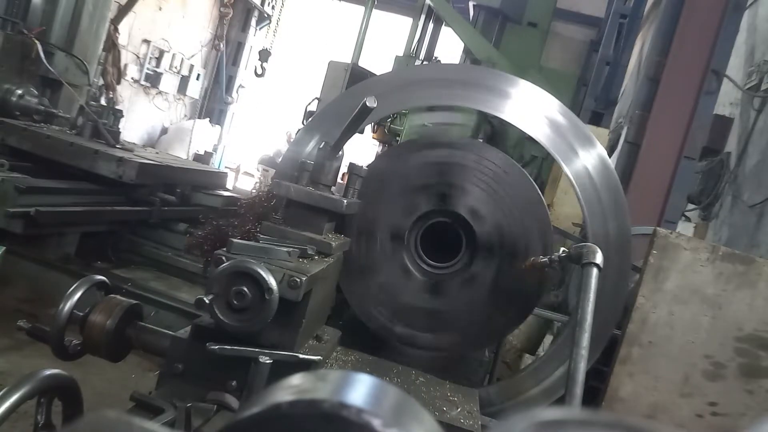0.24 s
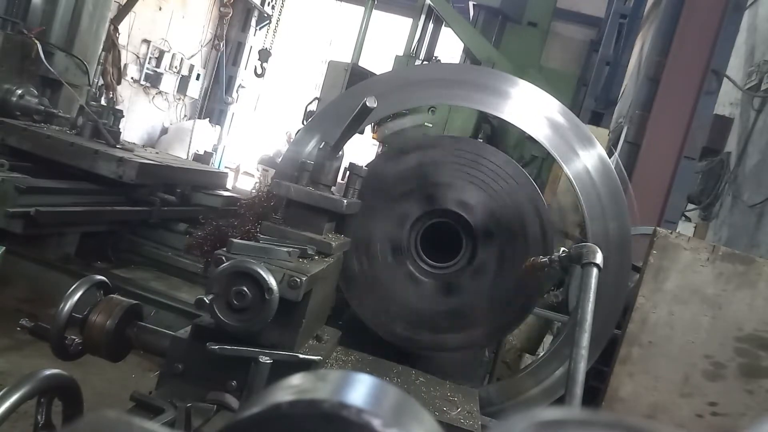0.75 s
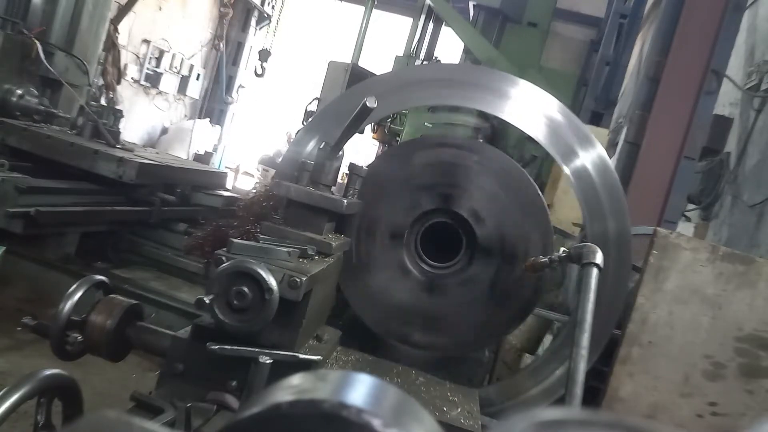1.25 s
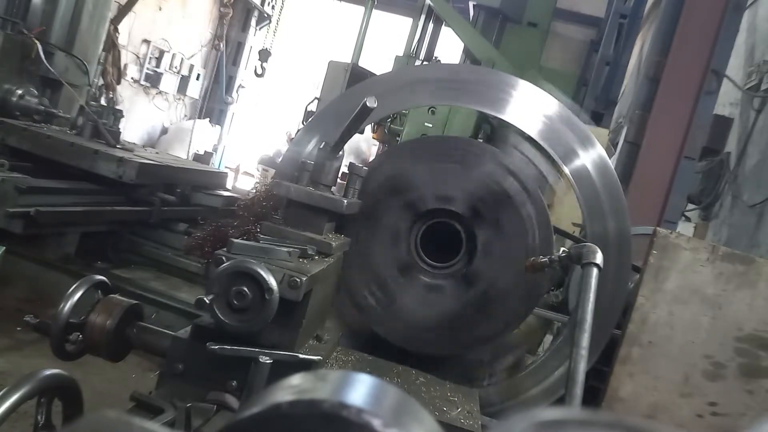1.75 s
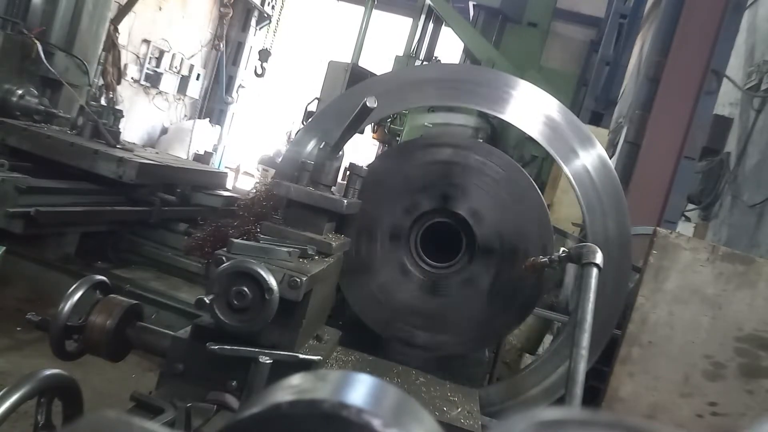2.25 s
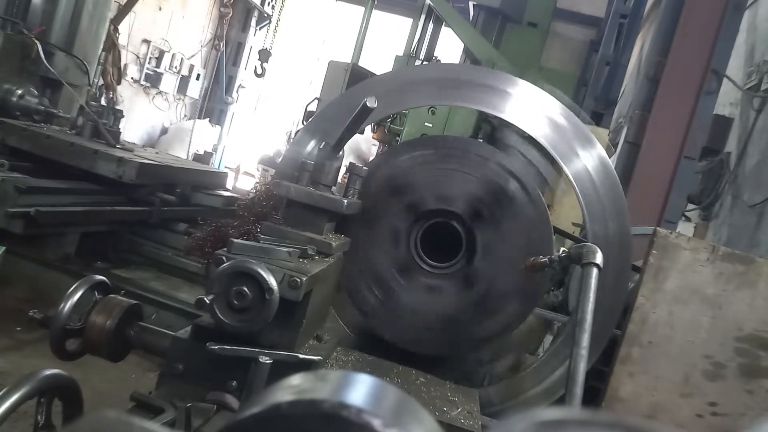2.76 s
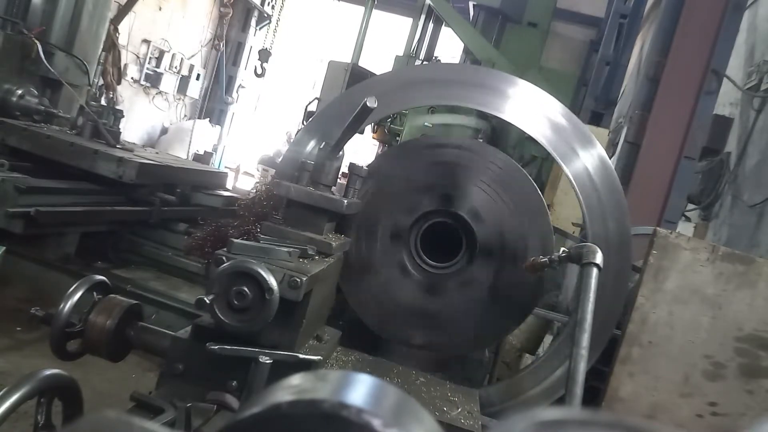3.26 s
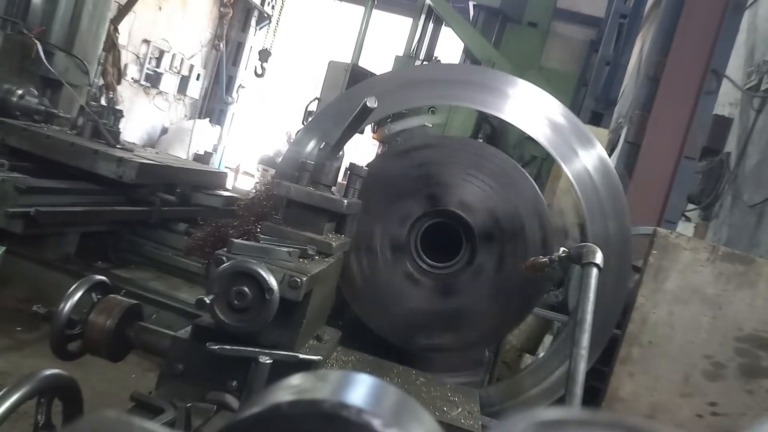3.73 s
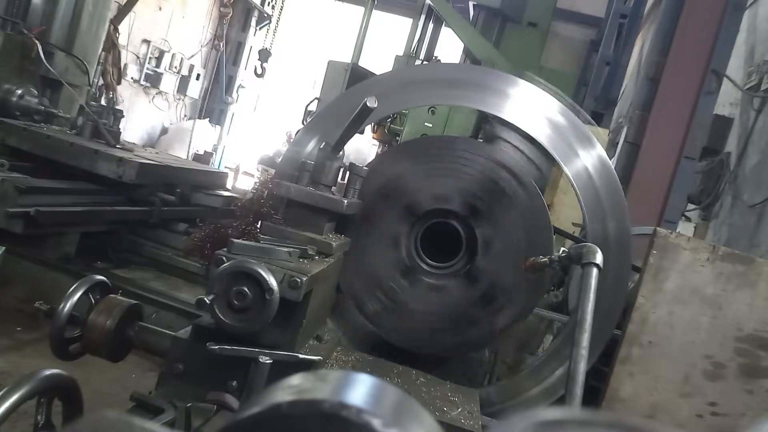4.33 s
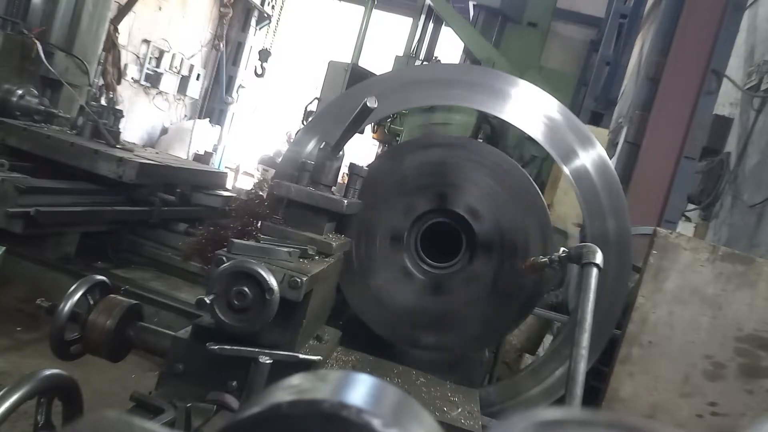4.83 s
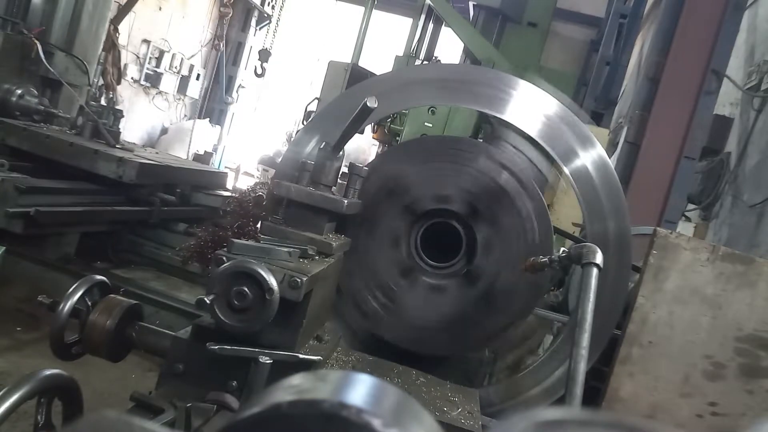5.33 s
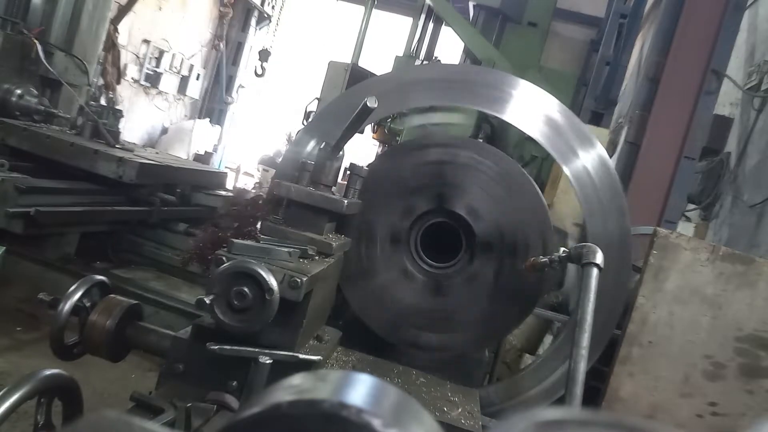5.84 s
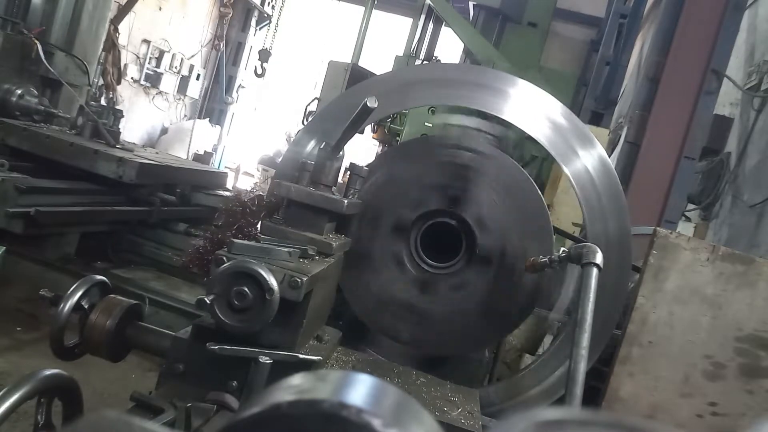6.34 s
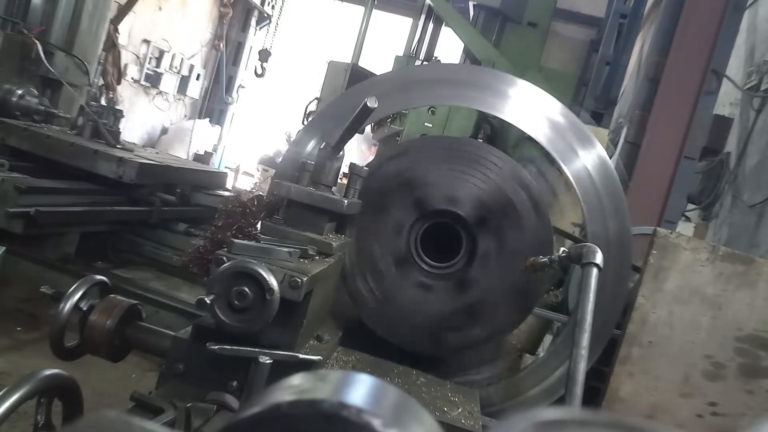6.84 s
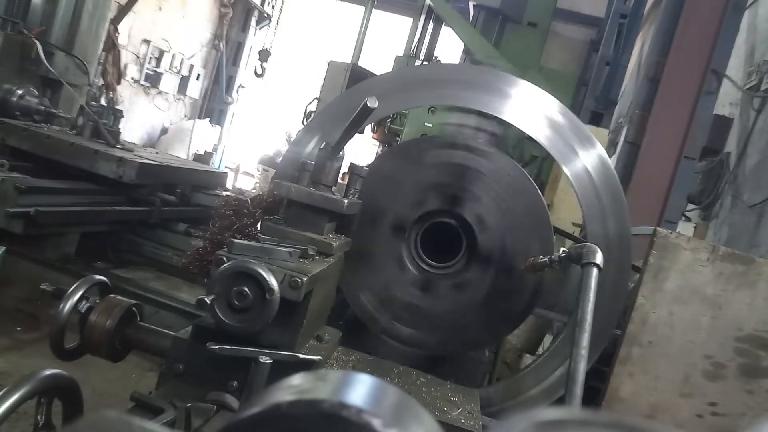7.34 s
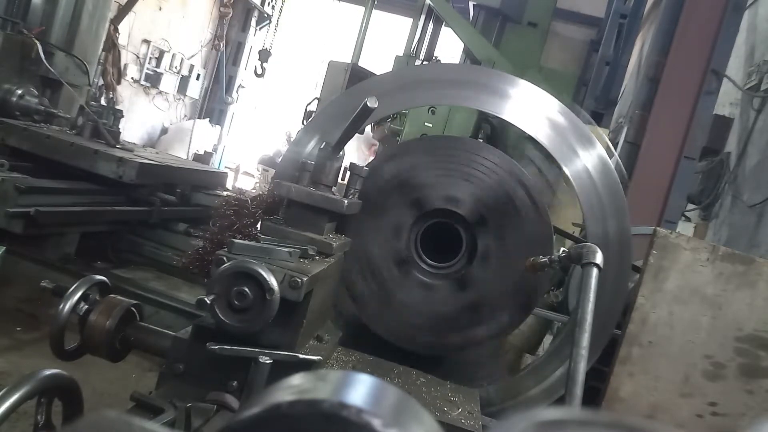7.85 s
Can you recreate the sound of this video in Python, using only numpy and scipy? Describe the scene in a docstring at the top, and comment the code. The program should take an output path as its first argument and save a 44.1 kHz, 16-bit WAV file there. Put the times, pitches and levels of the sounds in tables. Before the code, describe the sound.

Steady lathe rumble and rushing gears fill a reverberant workshop, heard from near the chuck on one microphone. Metal scrapes and hisses as chips shear off. Over this, a loud, fluttering whistle-like squeal snaps on and drops away, repeating regularly through the middle, then becoming sparse. Near the end only thin, faint singing and hiss remain, and the machine noise rises at the very last moment.

```python
"""In a workshop, from in front of the chuck: a large lathe turns a steel ring.
Furthest back, shaped noise and resonances make the drive's rumble, the gears and the ring's faint modes.
Nearer, random slips hiss as the chip; the hiss sinks once a revolution, where the cut runs shallow.
Foremost, the tool chatters: a wandering tone near 5.2 kHz with side modes and overtones
breaks in and dies away, fluttering in the room's echoes."""
import sys
import numpy as np
from scipy import signal
from scipy.fft import rfft, irfft, next_fast_len
from scipy.io import wavfile
from scipy.ndimage import uniform_filter1d, minimum_filter1d

SR = 44100
rng = np.random.default_rng(int(sys.argv[2]) if len(sys.argv) > 2 else 0)


def output_pcm(signal):
    """Save a mono or channel-first signal as 16-bit PCM at the path in sys.argv[1].

    Samples are clipped to [-1, 1] before scaling.
    """
    pcm = np.clip(np.atleast_2d(signal).T, -1, 1) * 32767
    wavfile.write(sys.argv[1], SR, np.round(pcm).astype(np.int16))


N = 356328  # length in samples

# Noise spectra of the drive, the gears, the scraping tool and the chip (shape only):
# pitch_hz [Hz], level_db [dB per Hz, relative]
RUMBLE_SPECTRUM = [(25, -38), (48, -22), (64, -22), (76, -9), (86, -21), (100, -7), (125, -3), (150, -4),
                   (200, -0.5), (320, -1.5), (460, 0), (540, -12.5), (800, -33.5), (1600, -52)]
GEAR_SPECTRUM = [(300, -23), (560, -1.5), (760, 2.5), (1100, -2.5), (1400, -0.5), (1900, -7), (2800, -16.5),
                 (6000, -49.5)]
SCRAPE_SPECTRUM = [(900, -21), (1500, -7), (1950, -3.5), (2400, 3), (2900, -1.5), (3300, 0), (3800, -1.5),
                   (4900, -2), (6200, -8.5), (7800, -14), (9300, -36.5)]
CHIP_SPECTRUM = [(2000, -2.5), (4500, 9.5), (6200, 10), (7200, 5), (8300, 2), (8900, -8.5), (9600, -23),
                 (10500, -7), (11700, -6), (13000, -3), (13750, -6), (14700, -3), (15250, -9), (16000, -6)]
# Hum of the drive: pitch_hz [Hz], width_hz [Hz], level_db [dB]
HUM_MODES = [(75.4, 4, -59), (122, 6, -50), (172, 6, -48), (200, 9, -43), (366, 8, -49)]
# Modes of the steel ring: pitch_hz [Hz], width_hz [Hz], level_db [dB, before load and trim]
RING_MODES = [(732, 12, -53), (975, 6, -53), (1243, 5, -49), (1627, 7, -47), (1724, 5, -48), (2204, 9, -52),
              (2502, 5, -42.5), (2587, 7, -51), (3123, 4, -52), (3468, 9, -54), (3548, 5, -50),
              (3645, 9, -54), (3903, 5, -53), (4165, 5, -47.5), (4510, 20, -51), (4701, 7, -50),
              (4958, 8, -51)]
# Modes of the tool and its holder, shaken by the chip:
# pitch_hz [Hz], width_hz [Hz], level_db [dB, relative]
HOLDER_MODES = [(3262, 24, 6), (5270, 70, -1), (5530, 110, 1), (5780, 110, 1), (6245, 6, -7), (6515, 14, 1),
                (6788, 26, -4), (7025, 20, -4), (7172, 30, 0), (7288, 7, -3), (7547, 10, -4),
                (7660, 26, -7), (7810, 12, -4), (8075, 16, -14), (8328, 7, -11), (11220, 130, -18),
                (12100, 130, -14), (12570, 160, -13), (13100, 100, -11), (13750, 330, -6),
                (14210, 110, -13), (15240, 150, -7)]
# Modes of the thin, higher whistle of a smooth cut: pitch_hz [Hz], width_hz [Hz], level_db [dB, relative]
HIGH_WHISTLE_MODES = [(5765, 40, -2), (5830, 35, -7)]
# Modes that beat against the squeal: pitch_hz [Hz], width_hz [Hz], level_db [dB, relative]
BEATING_MODES = [(4701, 14, -18), (4958, 16, -12.5), (4990, 200, -8), (5418, 40, -1), (5470, 45, 0),
                 (5535, 35, -5), (5590, 70, -16)]
# Load on the machine, heard as the level of its noise: time_s [s], level_db [dB, only its swing counts]
LOAD_CURVE = [(0.0, -30), (0.02, -28), (0.81, -31), (2.43, -29), (5.54, -28), (5.83, -25.5), (7.83, -27.5),
              (8.03, -21.5), (8.08, -21.5)]
# Turns on which the tool chatters; the growth comes before start_s:
# start_s [s, full level reached], hold_s [s], level_db [dB, main tone before flutter],
# growth_db_per_s [dB/s], pitch_hz [Hz, before onset and wander], side_db [dB, before onset and trim]
CHATTER_TURNS = [(0.01, 0.11, -8, 370, 5193, -15), (0.249, 0.31, -8.5, 600, 5191, -15),
                 (0.692, 0.32, -11.0, 722, 5199, -16.0), (1.729, 0.19, -12.0, 260, 5190, -12.5),
                 (2.018, 0.33, -10.0, 800, 5203, -13), (2.477, 0.32, -10, 360, 5193, -13),
                 (2.903, 0.34, -11.0, 630, 5191, -14), (3.374, 0.31, -9.5, 468, 5193, -12.5),
                 (3.814, 0.32, -10.5, 500, 5182, -13.5), (4.253, 0.32, -11.0, 590, 5180, -12.5),
                 (5.275, 0.21, -11.5, 510, 5175, -10.5), (6.171, 0.2, -11.5, 420, 5185, -10),
                 (6.471, 0.33, -9.5, 520, 5182, -10.5)]
# Turns on which the tool cuts smoothly and barely sings:
# start_s [s, full level reached], hold_s [s], level_db [dB, main tone before flutter and dip],
# pitch_hz [Hz, before wander], whistle_db [dB, before mode levels and flutter]
SMOOTH_TURNS = [(1.17, 0.27, -37, 5187, -43), (4.736, 0.29, -36.5, 5200, -40),
                (5.631, 0.275, -36.5, 5230, -42), (6.04, 0.081, -47, 5230, -42),
                (6.934, 0.27, -33, 5210, -35.5), (7.385, 0.296, -38.5, 5290, -39.5),
                (7.855, 0.28, -30.5, 5300, -30)]

# the ring is out of round: once a turn the cut runs shallow
TURN_S, FIRST_SHALLOW_S, SHALLOW_HALF_S = 0.4444, 0.188, 0.072
HISS_DIP_DB, SINGING_DIP_DB = 6, 2  # dips of the chip and the faint singing there

# each layer before its trims at mean load, and the share of the load's swing that it follows
RUMBLE_DB, RUMBLE_FOLLOWS = -32, 0.9
GEARS_DB, GEARS_FOLLOWS = -34.5, 1.07
SCRAPE_DB, SCRAPE_FOLLOWS = -30, 0.87
CHIP_DB, CHIP_FOLLOWS = -51.5, 0.51

SMOOTH_EDGE_DB_PER_S, SMOOTH_HISS_DB = 222, 3.5  # rise and fall of smooth cuts; extra chip level in them
# chatter collapses quickly when the cut eases, then the steel rings on
COLLAPSE_DB_PER_S, RING_ON_BELOW_DB, RING_ON_DB_PER_S = 201, 10, 52
# after a turn without chatter the squeal turns sharp and harsh just ahead of full level, then settles
ONSET_SHARP_HZ, ONSET_HARSH_DB, ONSET_LEAD_S, SETTLE_S = 29.74, 10.5, 0.043, 0.055
FLUTTER_DB, FAINT_FLUTTER_DB, FLUTTER_PER_S = 1.76, 2.6, 9.8
SLOW_WANDER_HZ, FAST_WANDER_HZ, RIPPLE_HZ = 10.96, 15.9, 15  # pitch swings before harshness scales them
CUTOFF_HZ = 15800


def from_db(db):
    """Decibels to gain."""
    return 10 ** (np.asarray(db) / 20)


def rms_one(x):
    """Scale to unit power."""
    return x / np.sqrt(np.mean(np.abs(x) ** 2) + 1e-20)


def in_time(rows):
    """One interpolated curve per column after the time, a value for each sample."""
    time_s, *columns = np.transpose(rows)
    return [np.interp(np.arange(N) / SR, time_s, column) for column in columns]


def drift(rate):
    """Smooth chance with unit spread; it wanders faster at a higher rate in Hz."""
    r = np.exp(-20 * np.pi * rate / SR)
    # made at a tenth of the sample rate, past the filter's run-in
    noise = rng.standard_normal(N // 10 + 8002)
    slow = signal.lfilter([1], [1, -2 * r, r * r], noise)[8000:]
    return np.interp(np.arange(N) / 10, np.arange(len(slow)), rms_one(slow))


def coloured(x, spectrum):
    """Give x a smooth spectrum that falls off beyond the table's ends; unit power."""
    size = next_fast_len(N)
    hz, level_db = np.transpose(spectrum)
    bins = np.maximum(np.fft.rfftfreq(size, 1 / SR), 1)
    low_edge = 1 + (hz[0] / 2 / bins) ** 4
    high_edge = 1 + (bins / hz[-1] / 2) ** 10
    edge = 1 / np.sqrt(low_edge * high_edge)
    shape = from_db(np.interp(np.log(bins), np.log(hz), level_db))
    return rms_one(irfft(rfft(x, size) * edge * shape, size)[:N])


def resonate(x, hz, width):
    """One resonance of the given width in Hz, with gain 1 on its top."""
    r = np.exp(-np.pi * width / SR)
    feedback = [1, -2 * r * np.cos(2 * np.pi * hz / SR), r * r]
    return signal.lfilter(np.array([1, 0, -1]) * (1 - r * r) / 2, feedback, x)


def shaken(modes, skirt=6):
    """Modes kept ringing by a random force; a second, wider resonance steepens their skirts."""
    force = rng.standard_normal(N + SR // 2)  # half a second of run-in
    out = np.zeros(N)
    for hz, width, db in modes:
        mode = resonate(resonate(force, hz, width), hz, width * skirt)
        out += from_db(db) * rms_one(mode[-N:])
    return out


def evened(x, seconds):
    """Hold the slow level near 1 and keep the fast flutter."""
    size = max(int(seconds * SR), 2)
    power = uniform_filter1d(uniform_filter1d(x * x, size), size)
    return x / np.sqrt(power + 1e-9)


def ringing(x, t60, wet_db):
    """Direct sound plus a dense dying tail: a room's echoes, or the countless modes of a steel body."""
    t = np.arange(SR // 2) / SR
    tail = rng.standard_normal(len(t)) * from_db(-60 * t / t60) * (t > 0.003)
    run_in = np.pad(x, (len(t), 0), mode="reflect")
    wet = signal.fftconvolve(run_in, tail / np.linalg.norm(tail))[len(t):len(t) + N]
    return x + from_db(wet_db) * wet


def swell(start, hold, growth, decay):
    """Growth up to start, hold, then decay, in dB below the top; slopes in dB per second."""
    t = np.arange(N) / SR - start
    return np.minimum(np.minimum(growth * t, decay * (hold - t)), 0)


def load():
    """The load in dB about its mean."""
    level_db, = in_time(LOAD_CURVE)
    return level_db - level_db.mean()


def shallow():
    """0 to 1: a smooth bump each time the shallow side of the ring passes the tool."""
    since_first = np.arange(N) / SR - FIRST_SHALLOW_S
    away_s = np.abs((since_first + TURN_S / 2) % TURN_S - TURN_S / 2)
    return np.cos(np.pi / 2 * np.minimum(away_s / SHALLOW_HALF_S, 1)) ** 2


def machine():
    """Behind the cut: the drive rumbles and hums, gears rush, the tool scrapes and the ring sings along.

    All but the hum grow louder under load."""
    load_db = load()
    rumble_db = RUMBLE_DB + RUMBLE_FOLLOWS * load_db + 0.54 * drift(8.8)
    rumble = from_db(rumble_db) * coloured(rng.standard_normal(N), RUMBLE_SPECTRUM)
    gears_db = GEARS_DB + GEARS_FOLLOWS * load_db + 0.5 * drift(30)
    gears = from_db(gears_db) * coloured(rng.standard_normal(N), GEAR_SPECTRUM)
    scrape_db = SCRAPE_DB + SCRAPE_FOLLOWS * load_db + 0.58 * drift(30)
    scrape = from_db(scrape_db) * coloured(rng.standard_normal(N), SCRAPE_SPECTRUM)
    ring = from_db(1.1 * load_db + 1.5) * shaken(RING_MODES)
    return rumble + shaken(HUM_MODES) + gears + scrape + ring


def chip():
    """The chip shears off in tiny uneven slips that hiss through the steel and shake the tool holder.

    Smooth cuts add a high whistle."""
    smooth = [from_db(swell(start, hold, SMOOTH_EDGE_DB_PER_S, SMOOTH_EDGE_DB_PER_S))
              for start, hold, *_ in SMOOTH_TURNS]
    cut_db = CHIP_DB + CHIP_FOLLOWS * load() - HISS_DIP_DB * shallow() + SMOOTH_HISS_DB * sum(smooth)
    slips = rng.standard_normal(N) * from_db(3.2 * drift(200))
    hiss = from_db(10) * coloured(ringing(slips, t60=0.055, wet_db=-4), CHIP_SPECTRUM)
    holder = from_db(2) * shaken(HOLDER_MODES)
    cutting = from_db(cut_db + 1.2 * drift(25)) * (hiss + holder)
    whistle_gain = sum(gate * from_db(db) for gate, (*_, db) in zip(smooth, SMOOTH_TURNS))
    whistle_flutter = from_db(FAINT_FLUTTER_DB * drift(FLUTTER_PER_S))
    return cutting + whistle_gain * whistle_flutter * shaken(HIGH_WHISTLE_MODES)


def vibration():
    """Level of the tool's main tone in dB: chatter, its ringing on, and the faint singing of smooth cuts."""
    loud, faint = [], []
    for start, hold, db, growth, _, _ in CHATTER_TURNS:
        loud.append(db + swell(start, hold, growth, COLLAPSE_DB_PER_S))
        faint.append(db - RING_ON_BELOW_DB + swell(start, hold, growth, RING_ON_DB_PER_S))
    for start, hold, db, _, _ in SMOOTH_TURNS:
        faint.append(db + swell(start, hold, SMOOTH_EDGE_DB_PER_S, SMOOTH_EDGE_DB_PER_S))
    faint_db = np.max(faint, axis=0) - SINGING_DIP_DB * shallow()
    return np.maximum(np.max(loud, axis=0), faint_db)


def tuning():
    """Pitch in Hz and harshness in dB: each turn holds its own, both raised as chatter breaks in from rest."""
    t = np.arange(N) / SR
    turns = [(start, hold, hz) for start, hold, _, _, hz, _ in CHATTER_TURNS]
    turns += [(start, hold, hz) for start, hold, _, hz, _ in SMOOTH_TURNS]
    pitch, = in_time(sorted((edge, hz) for start, hold, hz in turns for edge in (start, start + hold)))
    harsh_db, = in_time([(edge, db) for start, hold, _, _, _, db in CHATTER_TURNS
                         for edge in (start, start + hold)])
    # from rest: more than one turn of quiet since the last chatter
    from_rest = [start for (last, hold, *_), (start, *_) in zip(CHATTER_TURNS, CHATTER_TURNS[1:])
                 if start - last - hold > TURN_S]
    fresh = sum(np.exp(-np.abs(t - start + ONSET_LEAD_S) / SETTLE_S) for start in from_rest)
    return pitch + ONSET_SHARP_HZ * fresh, harsh_db + ONSET_HARSH_DB * fresh


def squeal():
    """The tool tip vibrates by itself in its first mode; side modes beat against it, the room makes it flutter."""
    level_db = vibration()
    pitch, harsh_db = tuning()
    extra_harsh_db = harsh_db - harsh_db.mean()
    # the uneven chip pulls the pitch about, more so in harsh chatter; a ripple in the drive rocks it
    ripple = np.sin(2 * np.pi * 49.7 * np.arange(N) / SR)
    wander = SLOW_WANDER_HZ * drift(24.6) + FAST_WANDER_HZ * drift(100) + RIPPLE_HZ * ripple
    wander = wander * from_db(0.28 * extra_harsh_db)
    first = np.exp(2j * np.pi * np.cumsum(pitch + wander) / SR)

    # faint tones flutter more deeply than loud ones
    flutter_depth_db = np.interp(level_db, [-30, -15], [FAINT_FLUTTER_DB, FLUTTER_DB])
    flutter_db = flutter_depth_db * np.minimum(drift(FLUTTER_PER_S), 1)
    main_tone = evened(ringing(first.real, t60=0.39, wet_db=9), seconds=0.05)
    out = from_db(level_db + flutter_db) * main_tone

    # the tip's swing has a ceiling; side modes and overtones follow it without the level flutter
    swing_db = np.minimum(level_db, -10.5)
    beating = signal.hilbert(shaken(BEATING_MODES, skirt=3.4), next_fast_len(N))[:N]
    side = from_db(harsh_db) * rms_one(beating)
    out += from_db(swing_db + 3) * side.real

    # the tip leaves the cut at each swing, which adds overtones: strongest in harsh chatter
    tip = first + from_db(1.5) * side
    tip = tip / (np.abs(tip) + 0.01) ** 0.26  # compress the beats
    overtone_db = 1.43 * swing_db + extra_harsh_db - 24
    for order in (2, 3):
        overtone = ringing((tip ** order).real, t60=0.4, wet_db=11)
        out += from_db(overtone_db) * evened(overtone, seconds=0.049)
    return out


def scene():
    """Everything as heard in front of the chuck, on one microphone channel."""
    return (machine() + chip() + squeal())[None]


def record(dry):
    """A quick limiter holds the microphone signal's peaks near full scale; a steep low-pass cuts the top."""
    size = SR // 200  # 5 ms
    allowed = 1 / np.maximum(np.abs(dry), 1)
    gain = uniform_filter1d(minimum_filter1d(allowed, size), size)
    low_pass = signal.ellip(12, 0.2, 80, CUTOFF_HZ, fs=SR, output="sos")
    return signal.sosfilt(low_pass, dry * gain)


dry = scene()
out = record(dry)
output_pcm(out)
```